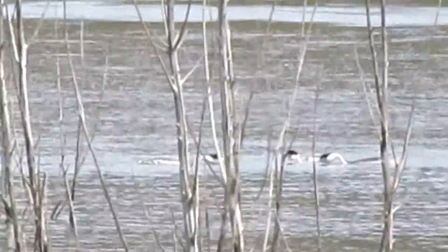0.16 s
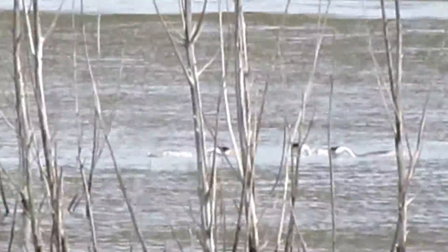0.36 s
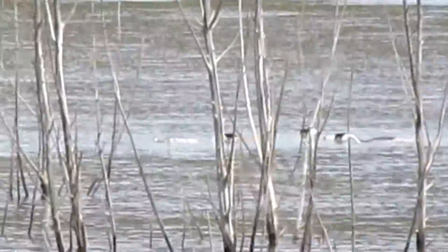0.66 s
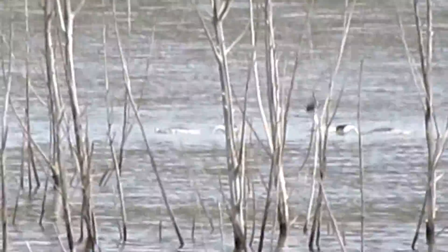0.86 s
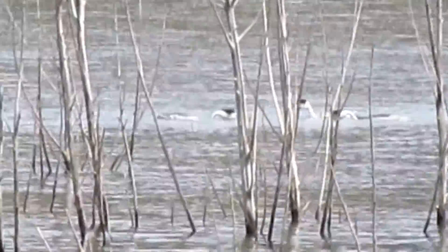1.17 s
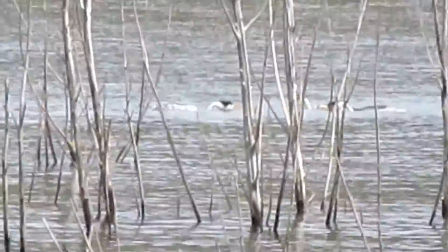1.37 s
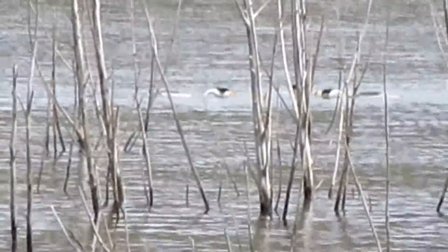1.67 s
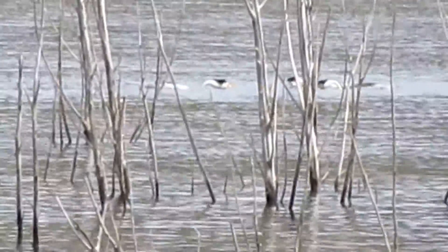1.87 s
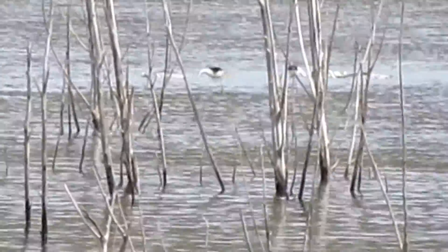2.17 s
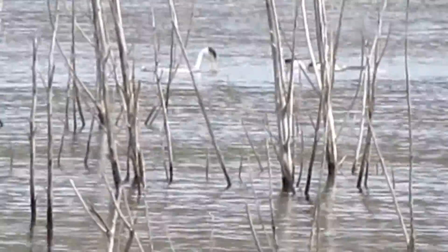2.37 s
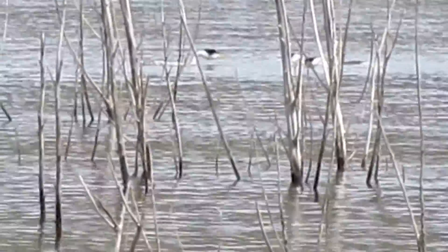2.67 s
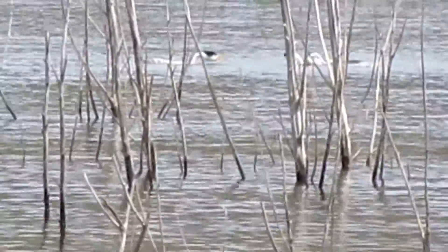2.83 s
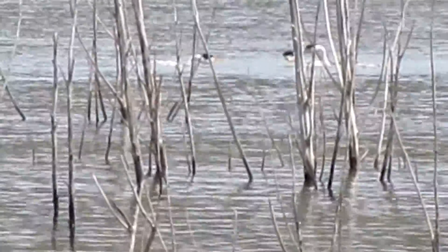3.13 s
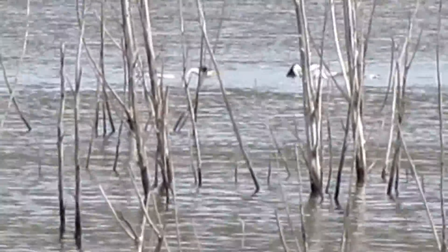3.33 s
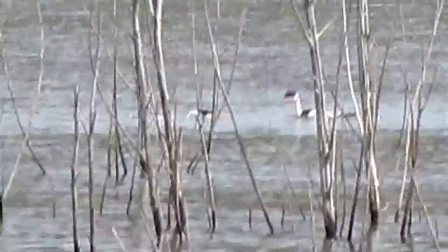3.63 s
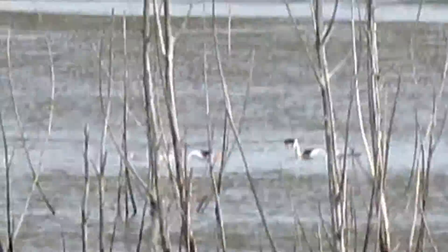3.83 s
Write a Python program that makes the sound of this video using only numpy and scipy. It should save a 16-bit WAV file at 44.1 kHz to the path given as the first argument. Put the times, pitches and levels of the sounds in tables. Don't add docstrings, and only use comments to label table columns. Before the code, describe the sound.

Grebes trill across a pond in quick, dry volleys of high pips and short held notes. Scattered calls open the scene, with a light splash around 0.8-1.1 s. A soft whistle comes at 1.7 s, a dense rattle at 2.0-2.5 s, then sparse calls before a loud volley and higher whistle from 3.3 s. Wind thuds on the microphone, strongest until 2 s, easing near 3 s, over faint water hiss.

```python
import sys
import numpy as np
from scipy import signal
from scipy.fft import rfft, irfft
from scipy.io import wavfile

SR = 44100
rng = np.random.default_rng(int(sys.argv[2]) if len(sys.argv) > 2 else 0)


def materialize(psi):
    bounded = np.clip(np.atleast_2d(psi).T, -1, 1)
    quanta = np.round(bounded * 32767).astype(np.int16)
    wavfile.write(sys.argv[1], SR, quanta)


def how_loud(loudness_db):
    steps = np.asarray(loudness_db, float) / 20
    return 10 ** steps


N = 176400


def evened(x):
    return x / np.sqrt(np.mean(x ** 2) + 1e-20)


def add(mix, start_s, sound):
    part = mix[max(round(start_s * SR), 0):][:len(sound)]
    part += sound[:len(part)]


def coloured(x, gain):
    return irfft(rfft(x) * gain(np.fft.rfftfreq(N, 1 / SR) + 1), N)


def shaped(points):
    table_hz, table_db = np.transpose(points)

    def gain(hz):
        inside = how_loud(np.interp(np.log(hz), np.log(table_hz), table_db))
        below = np.minimum(1, hz / table_hz[0]) ** 2
        above = np.minimum(1, table_hz[-1] / hz) ** 4
        return inside * below * above

    return evened(coloured(rng.standard_normal(N), gain))


def slow(speed_hz):
    return evened(coloured(rng.standard_normal(N), lambda hz: 1 / (1 + (hz / speed_hz) ** 2)))


def tone(pitch_hz, length_s, rise, octave_db, skew, phase):
    u = np.arange(round(length_s * SR)) / (length_s * SR)
    glide_hz = pitch_hz * (1 + rise * (u - .5))
    turn = 2 * np.pi * (np.cumsum(glide_hz) / SR + phase)
    shape = np.sin(np.pi * u ** skew) ** 2
    octave = how_loud(octave_db) * 2 * (1 - u) * shape * np.sin(2 * turn)
    return shape * (np.sin(turn) + octave)


# time_s, octave_lift_db
BILL_FACING = [(0, 7), (1.25, 5), (1.4, -18), (1.85, 0), (2.05, -3.5), (2.41, 5.5), (2.46, 0), (3.2, 3.5),
               (3.65, -1), (4, -0.5)]


def facing(time_s):
    return np.interp(time_s, *np.transpose(BILL_FACING))


# centre_s, level_db, pitch_hz
LOUD_PIPS = [(0.159, -32, 2720), (0.212, -30, 2550), (0.654, -31, 2450), (0.6847, -31, 2470),
             (0.752, -30, 2440), (1.8924, -40, 2350), (2.09, -28.5, 2490), (2.1232, -28, 2400),
             (2.1575, -30, 2400), (2.168, -28, 2390), (2.1979, -24.5, 2510), (2.205, -30, 2790),
             (2.2378, -30, 2790),
             (2.2845, -30, 2340), (2.3354, -28, 2880), (2.4019, -25.5, 2850), (2.7092, -26.5, 2490),
                (3.3044, -30.5, 2550), (3.39, -28, 2810), (3.4286, -28.5, 2730), (3.466, -24.5, 2810),
                (3.5009, -23.5, 2860), (3.5228, -27, 2580), (3.5335, -25, 2840), (3.5636, -30, 2600),
                (3.6, -22, 2870), (3.6389, -22, 2890), (3.6636, -37, 2400), (3.699, -31, 2360),
                (3.763, -31, 2450), (3.798, -27.5, 2360), (3.838, -30.5, 2350), (3.8826, -30, 2250)]
# centre_s, pitch_hz
FIRM_PIPS = [(0.2863, 3110), (0.7158, 2410), (0.7896, 2500), (0.7996, 2400), (0.9966, 2650), (1.1029, 2840),
             (1.1742, 2890), (1.3005, 2430), (1.8806, 2310), (2.0293, 2330), (2.181, 2480), (2.2307, 2560),
             (2.2458, 2400), (2.2712, 2320), (2.2932, 2340), (2.329, 2300), (2.4409, 2820), (2.4808, 2900),
             (2.5117, 2630), (3.5748, 2300), (3.6756, 2380), (3.7329, 2310), (3.8746, 2400), (3.8931, 2330),
             (3.9544, 2500)]
MIDDLING_PIPS = [(0.0239, 2460), (0.2227, 2840), (0.2812, 2540), (0.5137, 2300), (0.5961, 2680),
                 (0.7258, 2920), (0.7587, 2740), (0.9742, 2630), (1.0361, 2290), (1.4656, 2690),
                 (1.5055, 2890), (1.5274, 2600), (1.6312, 2660), (1.6696, 2900), (2.0183, 2390),
                 (2.0502, 2470), (2.0602, 2430.0), (2.0747, 2300), (2.262, 2710), (2.3027, 2660),
                 (2.3516, 2470.0), (2.3785, 2500), (2.4189, 2900), (2.4319, 2200), (2.4742, 2400),
                 (2.5481, 2820), (3.2385, 2720), (3.3503, 2440), (3.4491, 2490), (3.9824, 2280)]
SOFT_PIPS = [(0.0967, 2610), (0.5023, 2340), (0.8325, 2460), (0.8774, 2300), (0.8874, 2290), (0.9103, 2600),
             (0.9237, 2300), (0.99, 2990), (1.028, 2140), (1.1655, 2460), (1.4987, 2540), (1.5415, 2820),
             (1.5634, 2780), (1.594, 2580), (1.6013, 2960), (1.676, 2350), (1.871, 2670), (2.4972, 2190),
             (2.5865, 2580), (2.6289, 2300), (2.7571, 2820), (3.1577, 2430), (3.2655, 2540), (3.299, 2900),
             (3.4757, 2350), (3.4872, 2520), (3.688, 2400), (3.918, 2670)]
FAINT_PIPS = [(0.0032, 2970), (0.828, 2850), (0.0398, 2560), (0.5545, 2320), (0.622, 2400), (0.6487, 2540),
              (0.6942, 2950), (0.069, 2900), (0.96, 2950), (1.083, 2170), (1.0935, 2030), (1.38, 2480),
              (1.39, 2730), (1.423, 2330), (1.709, 2850), (1.942, 2200), (2.0019, 2380), (2.6494, 2700),
              (2.699, 2800), (3.145, 2610), (3.1961, 2300), (3.282, 2480), (3.4097, 2620)]


def pips():
    usual_length_s, usual_rise, usual_octave_db = 0.004265, .11, -21
    out = np.zeros(N)
    rows = LOUD_PIPS
    quieter = [(FIRM_PIPS, -32), (MIDDLING_PIPS, -35), (SOFT_PIPS, -36.5), (FAINT_PIPS, -42.5)]
    for table, level_db in quieter:
        rows = rows + [(centre_s, level_db, pitch_hz) for centre_s, pitch_hz in table]
    for (centre_s, level_db, pitch_hz), (a, b, c, d) in zip(rows, rng.random((len(rows), 4))):
        length_s = usual_length_s * (1 + 0.16 * (a - .5))
        octave_db = usual_octave_db + facing(centre_s) + 7 * (c - .5)
        pip = tone(pitch_hz, length_s, usual_rise * 2 * b, octave_db, 1.0, d)
        click = how_loud(-25) * tone(1.55 * pitch_hz, .0015, 0, -10, 1, d)
        add(pip, 0, click)
        add(out, centre_s - 0.444 * length_s, how_loud(level_db) * pip)
        chaser_hz = pitch_hz * (1.06 - 0.16 * a)
        chaser = tone(chaser_hz, length_s, usual_rise, usual_octave_db, 0.6, b)
        add(out, centre_s + 0.0015 + 0.003 * c, how_loud(level_db - 8 * d - 4) * chaser)
    return out


# centre_s, level_db, pitch_hz, length_s
HELD_NOTES = [(0.058, -38.5, 2354, 0.017), (0.103, -40, 2330, 0.022), (0.281, -39, 2386, .016),
              (0.285, -37.5, 2880, 0.021), (0.507, -42, 2183, 0.019), (0.8765, -40.5, 2400, 0.028),
              (1.222, -41.5, 2350.0, 0.015), (1.642, -41, 2196, 0.034), (2.0248, -37.5, 2514, .023),
              (2.086, -35.5, 2330, 0.025), (2.1001, -38, 2523, .023), (2.177, -41, 2175, 0.031),
              (2.209, -40, 2360, 0.025), (2.244, -40, 2145, 0.025), (2.2555, -39.5, 2690, .028),
              (2.398, -37.5, 2290, 0.019), (3.318, -37.5, 2410, 0.027), (3.438, -40, 2237, 0.031),
              (3.5813, -42, 2183, 0.026), (3.851, -36, 2555, .023), (3.937, -35, 2140, 0.025),
              (0.839, -42, 2100, .02), (0.885, -44, 2150, .022), (0.929, -44.5, 2126, 0.019),
              (0.984, -45.5, 2120, .024), (1.685, -42.5, 2110, .016), (1.703, -43, 2220, .016),
              (1.889, -38, 2223, .026), (2.287, -41, 2090, .022), (2.336, -42, 2084, .022),
              (2.388, -44, 2070, .022), (2.437, -40.5, 2136, .022), (2.495, -55, 2120, .016),
              (3.481, -48, 2160, .026), (3.559, -38, 2410, 0.017), (3.841, -38, 2133, .02),
              (3.888, -35.5, 2170, .02), (3.992, -40.5, 2130, 0.012)]


def notes():
    out = np.zeros(N)
    draws = rng.random((len(HELD_NOTES), 3))
    for (centre_s, level_db, pitch_hz, length_s), (a, c, d) in zip(HELD_NOTES, draws):
        octave_db = -18 + facing(centre_s) + 6 * (c - .5)
        octave_db = octave_db - 12 * (pitch_hz > 2450)
        note = tone(pitch_hz, length_s, .04 * 2 * (a - .3), octave_db, 0.77, d)
        add(out, centre_s - length_s / 2, how_loud(level_db) * note)
    return out * (1 + .5 * slow(226))


# start_s, length_s, top_pitch_hz, level_db, second_voice_hz, upper_side_db, lower_side_db,
# middle_of_sides_s
WHISTLE_CALLS = [
    (1.708, .155, 2450, -41, 265, -3, -18, 1.803),
    (3.548, .122, 2750, -36, 290, -24, -1, 3.54),
]


def whistles():
    sag, edge_s, sides_s = .065, .012, .04
    out, waver, wobble = np.zeros(N), slow(200), slow(63)
    for start_s, length_s, top_hz, level_db, side_hz, upper_db, lower_db, middle_s in WHISTLE_CALLS:
        t = np.arange(round(length_s * SR)) / SR
        u = 2 * t / length_s - 1
        first = round(start_s * SR)
        now = slice(first, first + len(t))
        arch = 1 - sag * abs(u) ** 3 * (1 + u / 3)
        turn = 2 * np.pi * np.cumsum(top_hz * (arch + 0.005 * wobble[now])) / SR
        side = 2 * np.pi * side_hz * t
        upper = how_loud(upper_db) * np.sin(turn + side)
        lower = how_loud(lower_db) * np.sin(turn - side)
        sides_on = np.exp(-((start_s + t - middle_s) / sides_s) ** 4)
        sound = np.sin(turn) + sides_on * (upper + lower)
        edge = np.clip(np.minimum(t, length_s - t) / edge_s, 0, 1)
        level = how_loud(level_db + (1.4 + 2.1 * abs(u)) * waver[now])
        add(out, start_s, level * edge * sound)
    return out


# start_s, level_db, centre_hz
BILL_SNAPS = [(0.023, -42, 4200), (0.0954, -44, 4050), (.279, -43, 4300), (.281, -54, 7000),
              (2.0744, -53, 4030), (2.27, -43, 4200), (2.33, -50, 3700), (2.379, -47, 3700),
              (3.35, -50, 4230), (3.574, -34, 3430), (3.61, -43, 3870), (3.672, -49, 3950),
              (3.931, -45, 3770), (3.982, -45, 3700), (3.981, -40, 1130)]


def snaps():
    out = np.zeros(N)
    for (start_s, level_db, centre_hz), d in zip(BILL_SNAPS, rng.random(len(BILL_SNAPS))):
        add(out, start_s - .001, how_loud(level_db) * tone(centre_hz, 8 / centre_hz, -0.49, -25, 0.7, d))
    return out


def splash():
    start_s, length_s, drop_db, spray_db = .76, .34, -51, -59
    out, puff = np.zeros(N), np.zeros(N)
    clumps = rng.random(16)
    for k, (a, b, c, d) in enumerate(rng.random((110, 4))):
        drop = tone(2500 * 2.3 ** b, 0.002 + 0.009 * c ** 4, .1, -40, 0.5, d)
        clump = k % len(clumps)
        after_s = (clumps[clump] + clump) / len(clumps) * length_s + .014 * a
        add(out, start_s + after_s, how_loud(drop_db - 5 * b + 10 * (d - .5)) * drop)
    add(puff, start_s, np.hanning(round(length_s * SR)) ** .5)
    spray = puff * shaped([(2500, 9), (4800, -18), (6500, -9)])
    return out + how_loud(spray_db + 6.6 * slow(30)) * spray


def across_water(x):
    echo_db, t60_s = -9.5, .12
    t = np.arange(SR // 5) / SR
    sparse = rng.standard_normal(len(t)) * (rng.random(len(t)) < .04)
    taps = sparse * how_loud(-60 * t / t60_s) * (t > .002)
    return x + how_loud(echo_db) * signal.oaconvolve(x, taps / np.linalg.norm(taps))[:N]


def thud(swing_hz, skew):
    t = np.arange(-1500, 1500) / SR * swing_hz
    return np.exp(-(2.79 * t) ** 2) * np.cos(2 * np.pi * t * 0.89 + skew)


# time_s, level_db
WIND_STRENGTH = [
    (0, -27.5),
    (1.2, -27.5),
    (1.4, -33),
    (1.8, -26),
    (2.1, -30.5),
    (2.75, -32.5),
    (3.1, -39),
    (4, -35.5),
]
# pitch_hz, level_db (per Hz)
RUMBLE_COLOUR = [(20, -26), (70, 2), (127, -1.5), (233, -12.5), (318, -18), (650, -52)]


def wind():
    eddies_per_s = 45
    rumble = shaped(RUMBLE_COLOUR) * how_loud(2.5 * slow(7.5))
    size = how_loud(1.95 * rng.exponential(1, N).clip(0, 3)) * rng.choice([-1., 1.], N)
    size = size * (rng.random(N) < eddies_per_s / SR)
    kind = rng.integers(0, 6, N)
    eddies = np.zeros(N)
    for k, swing_hz in enumerate(np.geomspace(65, 195, num=6)):
        eddies += signal.oaconvolve(size * (kind == k), thud(swing_hz, k), "same")
    out = evened(evened(rumble) + how_loud(-0.5) * evened(eddies))
    return out * how_loud(np.interp(np.arange(N) / SR, *np.transpose(WIND_STRENGTH)))


# centre_s, peak_db, swing_hz
HARD_BUFFETS = [(0.083, -12, 157), (0.223, -14.5, 113), (0.359, -16, 162), (0.394, -15, 118),
                (0.452, -16.5, 93), (0.73, -13, 97), (0.781, -12.5, 159), (0.833, -12, 152),
                (0.86, -18, 121), (0.877, -11.5, 126), (0.911, -14, 113), (1.097, -12, 101),
                (1.132, -17.0, 110), (1.152, -15, 134), (1.18, -12.5, 125), (1.223, -11, 141),
                (1.582, -13, 117), (1.661, -11, 114), (1.686, -12.5, 133), (1.746, -13.5, 176),
                (1.811, -11.0, 126), (1.865, -13, 147), (1.881, -17, 112), (1.907, -12.5, 133),
                (1.929, -14.5, 128), (2.063, -17.5, 99), (2.436, -17.5, 114), (2.554, -15.0, 109),
                (2.684, -14.5, 94), (2.862, -19.5, 90), (3.117, -22, 110), (3.78, -17.5, 137)]


def buffets():
    out = np.zeros(N)
    half_s = 1500 / SR
    for (centre_s, peak_db, swing_hz), b in zip(HARD_BUFFETS, rng.random(len(HARD_BUFFETS))):
        add(out, centre_s - half_s, how_loud(peak_db + 0.5) * thud(swing_hz, 3.7 * b - 1))
    add(out, 1.746 - half_s, how_loud(-14) * thud(280, 0.39))
    return out


# pitch_hz, level_db (per Hz)
WATER_COLOUR = [(400, -2), (520, -9), (1110, -11.5), (2030, -23), (7290, -27.5), (15000, -34)]


def pond():
    return how_loud(-53) * shaped(WATER_COLOUR)


# pitch_hz, width_hz, level_db
HUM_BANDS = [
    (897, 29, -69),
    (1137, 140, -64.5),
]


def distant_hum():
    out = np.zeros(N)
    for pitch_hz, width_hz, level_db in HUM_BANDS:
        band = coloured(rng.standard_normal(N), lambda hz: 1 / (1 + (2 * (hz - pitch_hz) / width_hz) ** 2))
        out += how_loud(level_db + 2 * slow(4.3)) * evened(band)
    return out


def scene():
    birds = pips() + notes() + whistles() + snaps() + splash()
    return (across_water(birds) + wind() + buffets() + pond() + distant_hum())[None]


def low_pass(x):
    return signal.sosfilt(signal.butter(12, 15120, fs=SR, output="sos"), x)


def record(dry):
    mix = coloured(dry, lambda hz: hz < 15120)
    return low_pass(mix)


dry = scene()
out = record(dry)
materialize(out)
```